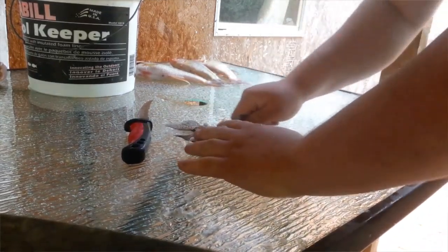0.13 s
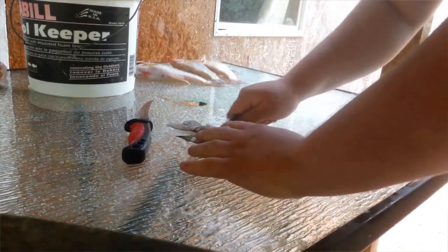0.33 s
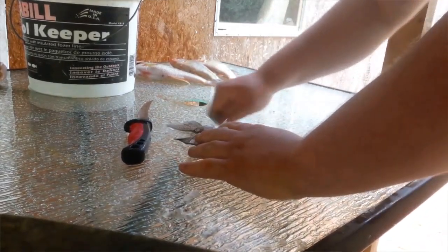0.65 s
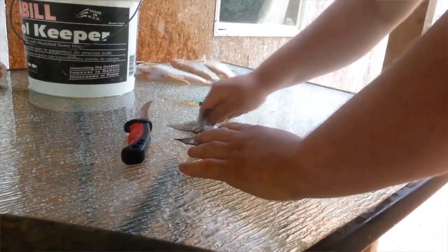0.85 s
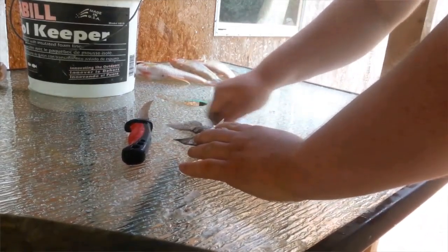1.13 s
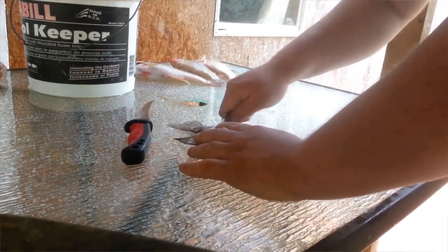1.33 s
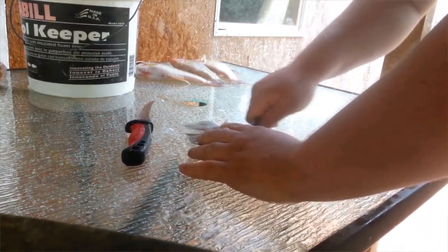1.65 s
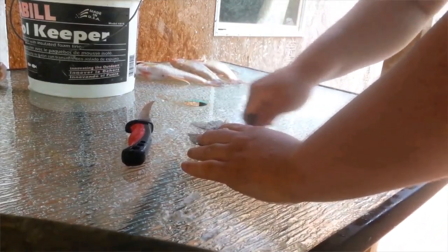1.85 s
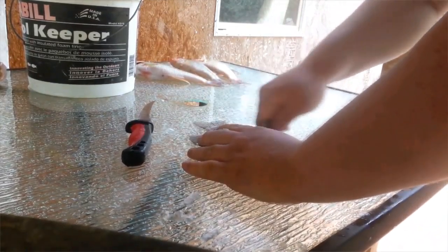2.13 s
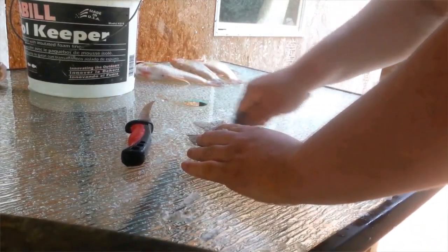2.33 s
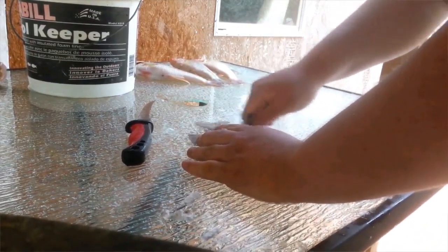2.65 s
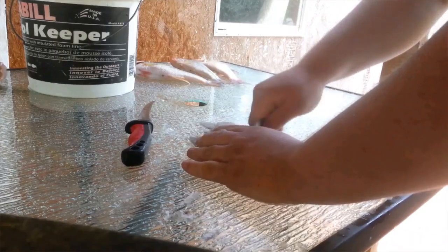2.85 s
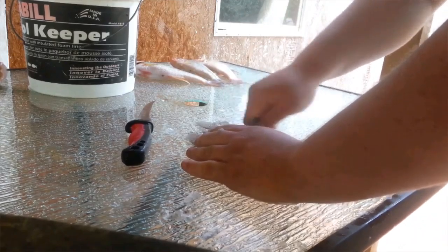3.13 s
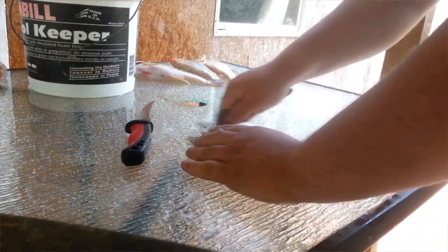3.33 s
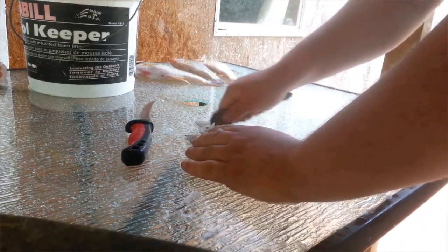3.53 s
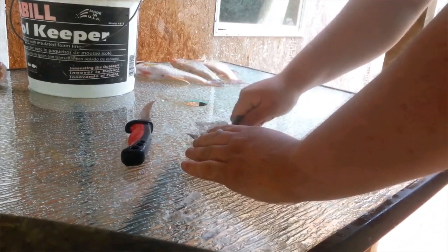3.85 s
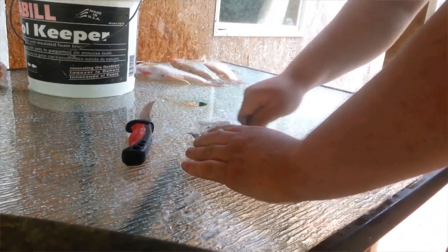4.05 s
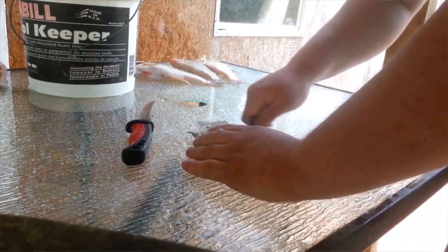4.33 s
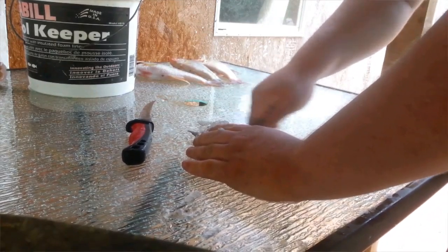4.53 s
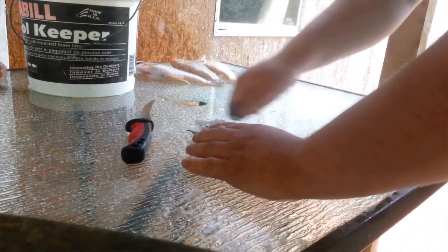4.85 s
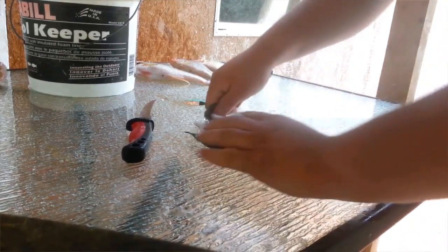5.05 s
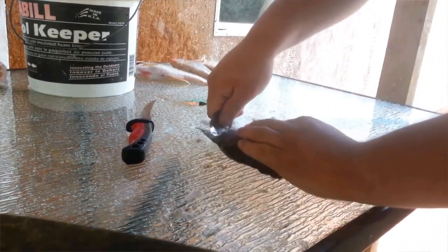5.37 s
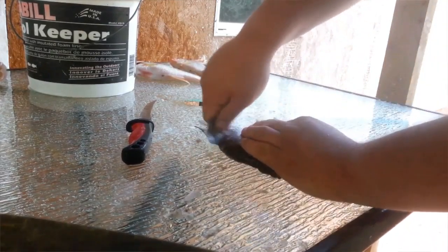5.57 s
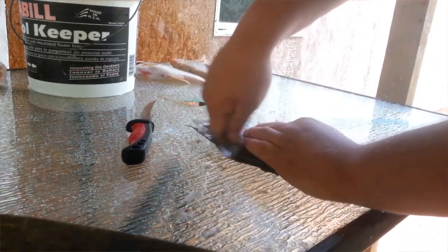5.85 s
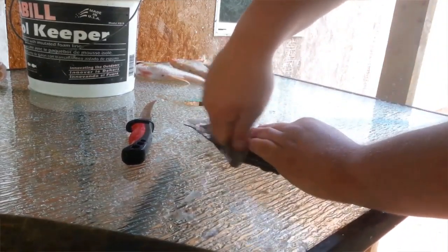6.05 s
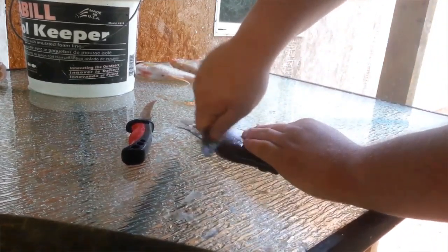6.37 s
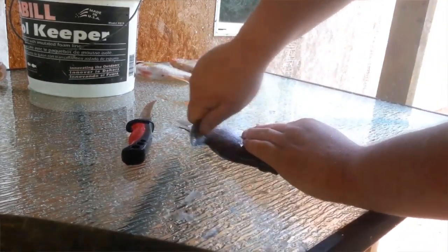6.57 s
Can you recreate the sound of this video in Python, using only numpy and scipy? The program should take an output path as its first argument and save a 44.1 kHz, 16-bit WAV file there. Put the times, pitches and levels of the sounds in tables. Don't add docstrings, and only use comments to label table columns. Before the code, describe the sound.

A spoon scrapes a small fish in quick short strokes on a glass table, scales crackling and hissing, while a far bird whistles and trills.

```python
import sys
import numpy as np
from scipy import signal
from scipy.io import wavfile
from scipy.ndimage import uniform_filter1d

SR = 44100
rng = np.random.default_rng(int(sys.argv[2]) if len(sys.argv) > 2 else 0)


def transcribe(u):
    v = np.clip(np.atleast_2d(u).T, -1, 1)
    q = np.round(v * 32767).astype(np.int16)
    wavfile.write(sys.argv[1], SR, q)


def undo_db(level):
    steps = np.asarray(level, float) / 20
    return 10 ** steps


N = 295632
TIME_S = np.arange(N) / SR
CONTROL_S = np.arange(0, N / SR + .002, .001)

# frequency in Hz, level in dB per Hz.
AIR_SPECTRUM = [(15, -47), (25, -14.5), (54, -12), (125, 3.5), (326, -0.5), (515, -5.5), (790, -7),
                (1120, -12), (3350, -15), (6200, -23.5), (10000, -19.5), (13100, -24), (15000, -10)]
# time in seconds, level in dB.
LEAF_LEVEL = [(0.0, -70), (1.32, -63), (1.7, -65), (2.37, -66), (2.99, -65), (3.79, -64.5), (4.74, -68.5),
              (5.75, -68), (5.99, -64.5), (6.7, -63.5)]
# frequency in Hz, likeness 0-1.
AIR_LIKENESS = [(40, 0.225), (100, 0.58), (250, 0.51), (600, 0.025), (15000, 0.0196)]

# start in seconds, length in seconds, from Hz, to Hz, level in dB.
WHISTLES = [(0.68, 0.04, 1854, 1990, -74), (0.84, 0.072, 1790, 1960, -69.5),
            (1.04, 0.04, 1753, 2040, -67.5), (1.224, 0.055, 1790, 2040, -65),
            (1.421, 0.075, 1838, 2093, -65), (1.632, 0.058, 1820, 1960, -66.5)]
# start in seconds, length in seconds, from Hz, to Hz, level in dB.
DROPS = [(s, .038, 2260, 1800, db - 2.5) for s, db in [ (3.29, -61), (3.4, -62), (3.61, -59), (3.79, -64),
         (3.875, -61), (3.96, -63), (4.045, -61), (4.15, -65), (4.245, -61), (4.325, -59), (4.41, -61),
         (4.5, -62)]]
# start in seconds, length in seconds, from Hz, to Hz, level in dB.
CHIPS = [(s, .009, from_hz, to_hz, db) for s, from_hz, to_hz, db in [ (4.718, 2900, 3500, -62),
         (4.731, 2450, 3100, -59), (5.037, 2700, 3600, -59), (5.049, 2500, 3150, -61),
         (5.063, 2600, 3100, -65), (5.173, 2450, 3450, -62), (5.186, 2500, 3500, -62),
         (5.198, 2600, 3300, -68), (5.328, 2700, 3200, -69), (5.34, 2800, 3500, -65),
         (5.351, 2900, 3450, -68), (5.478, 2900, 3400, -68), (5.49, 2900, 3400, -67),
         (5.637, 2400, 3200, -64), (5.65, 2700, 3600, -60), (5.662, 2900, 3450, -65),
         (5.78, 2450, 2900, -65), (5.786, 2500, 3400, -63), (5.93, 2300, 3300, -62),
         (5.943, 2350, 3450, -63)]]
# start in seconds, length in seconds, from Hz, to Hz, level in dB.
TRILLS = [(1.794, 0.053, 2250, 2500, -59.5), (1.845, .14, 2480, 2560, -58.5), (1.81, .16, 2000, 2100, -67),
          (1.985, 0.094, 2500, 2550, -58), (2.085, 0.26, 2620, 2720, -58), (1.94, 0.28, 2180, 2250, -64.5),
          (1.991, .03, 3500, 3500, -56), (2.101, 0.15, 3500, 3856, -66), (2.1, .14, 3300, 3260, -70),
          (2.299, 0.096, 2350, 2250, -60.5), (2.66, 0.063, 2600, 2000, -60), (2.8, .09, 2300, 2300, -60),
          (2.8, 0.19, 1798, 1828, -67), (2.95, 0.234, 2200, 2060, -60), (3.051, .12, 1851, 2000, -67),
          (6.345, 0.18, 2500, 2700, -63.5), (6.61, 0.088, 2700, 2600, -60), (5.75, .12, 3300, 3190, -63.5)]

# start in seconds, length in seconds, level in dB.
RUSTLES = [(1.283, 0.12, -58), (2.05, .22, -65), (2.624, 0.26, -71.5), (3.75, .07, -64),
           (3.931, 0.11, -67.5), (4.04, .12, -63.5), (4.148, 0.18, -64.5), (4.38, 0.091, -71.5),
           (6.33, .2, -69), (6.598, 0.15, -62)]
# frequency in Hz, width in Hz, gain in dB.
RUSTLE_MODES = [(2920, 540, -3), (3700, 550, 2), (4580, 680, -2.5)]

# time in seconds, peak in dB, thud share in dB, ring length share, crack in dB.
KNOCKS = [
    (1.094, -39, -28, 2.4, -10),
    (1.286, -23.5, -35, 1.8, -17),
    (3.448, -49, -5, 1.3, -16),
    (3.934, -68, -25, 1.1, -6),
    (3.983, -58, -28, 0.92, -6),
    (4.105, -37.5, -28, 1.06, -13),
    (4.208, -48, -10, 1.02, -14),
]
# frequency in Hz, level in dB, 60 dB decay in seconds.
SPOON_MODES = [(798, -4.5, 0.036), (976, -8.5, 0.06), (1210, 8, 0.019), (1310, -26, 0.009),
               (1960, -3, 0.021), (2250, -4, 0.0093), (2740, -8.5, 0.017), (3490, -9.5, 0.013),
               (4145, -6.5, 0.022), (5060, -5, 0.0064)]
# time in seconds, peak in dB.
SLAPS = [
    (6.529, -42),
    (6.587, -28),
]
# frequency in Hz, level in dB, 60 dB decay in seconds.
SLAP_MODES = [(293, 16.5, 0.013), (807, -3, 0.037), (1222, 1.5, 0.011), (1900, -15, 0.012),
              (2394, -21.5, 0.016)]
# time in seconds, peak in dB.
TICK = (6.0655, -31.5)

# peak in seconds, hiss in dB, treble lift in dB.
SPRAYS = [(0.018, -60.5, -10), (0.337, -66, 8), (.57, -71, 4), (0.635, -59.5, -7), (.68, -63.5, 3.5),
          (0.89, -59, 0), (.93, -71, 7), (1.125, -54, -3), (1.298, -55.5, -4.5), (1.33, -52.5, -22),
          (1.601, -61, 3), (1.85, -64, 6), (2.086, -49.5, -1.5), (2.303, -48.5, 3), (2.572, -49.5, 4.5),
          (2.802, -57, 3), (3.03, -45, 1.5), (3.25, -57, -10), (3.298, -58.5, 4), (3.501, -55, 0.5),
          (3.755, -64, -6), (3.993, -59, -5), (4.03, -64.5, -24), (4.115, -56, -22), (4.215, -58.5, -23),
          (4.26, -67, -20), (4.429, -61.5, -13), (4.708, -57.5, 2.5), (4.919, -47.5, -7)]
# peak in seconds, hiss in dB, treble lift in dB.
LIGHT_SPRAYS = [(5.17, -79.5, 9), (5.48, -65, -11), (5.84, -62, 3.5), (5.95, -63, -1), (6.065, -57, 3),
                (6.145, -69, 9), (6.224, -64.5, 4.5), (6.32, -66, 4.5), (6.41, -67.5, 9.5),
                (6.63, -54.5, 0), (6.7, -53.5, -20)]
# time in seconds, peak in dB.
SNAPS = [(0.8729, -48), (0.8834, -45), (1.0954, -49), (1.1193, -47), (1.2852, -28.5), (2.0593, -45),
         (2.2863, -36), (2.2967, -31), (2.3027, -28.5), (2.5272, -52), (2.5326, -44), (2.5573, -34.5),
         (2.5734, -37), (2.7871, -46), (3.0107, -38), (3.017, -32), (3.0404, -29), (3.2196, -51),
         (3.2985, -42), (3.4779, -54), (3.4913, -39.5), (3.7514, -46), (3.9811, -40), (4.104, -39),
         (4.2066, -45), (4.2373, -55), (4.4117, -60), (4.6513, -52), (4.7014, -44), (4.7096, -46),
         (4.8732, -52), (4.8884, -37)]
# frequency in Hz, level in dB per Hz.
HISS_SPECTRUM = [(880, -30), (1500, 7), (1640, -5), (1960, 7), (3000, 1.5), (4630, -9), (9000, -4.5),
                 (12500, -26.5), (15000, 35.5)]
# frequency in Hz, left minus right in dB.
HISS_LEAN = [(60, 0.0), (180, 1.0), (540, 64), (1630, 17.5), (4910, -29.5), (14800, -9)]
# frequency in Hz, width in Hz, gain in dB.
RATTLE_MODES = [(714, 180, 4.5), (816, 166, 4), (916, 108, -0.5), (1367, 263, -2.5), (1402, 114, 1.5),
                (2054, 225, -7.5), (2550, 1470, -18)]

# frequency in Hz, width in Hz, gain in dB.
TOP_MODES = [(119.7, 12, -4), (206.3, 10, 1.5), (251.8, 1.7, -3), (294.7, 4.8, -1.5), (350, 8.3, -3.5),
             (411.2, 15, 13), (532, 66, 1)]
# frequency in Hz, width in Hz, gain in dB.
AFTER_RING_MODES = [(300, 21.7, 2.5), (332.3, 10.7, 1.5)]
# time in seconds, peak in dB, hold-back of the edge 0-1.
BITES = [(0.872, -32.5, 0.46), (1.125, -32, 0.3), (2.288, -27, 0.65), (2.533, -34, .2), (3.225, -28, 0.22),
         (3.752, -32, 0.18), (4.208, -31, 0.18), (2.513, -58, 0.21), (2.755, -49, 0.39), (2.964, -50, 0.44),
         (3.04, -26, 0.5), (3.214, -35, 0.74), (3.49, -31, 0.44), (3.743, -56, 0.65), (4.412, -39, 0.57),
         (4.651, -32, 0.72), (4.873, -25.5, 0.53), (4.921, -27.5, 0.35)]
# start in seconds, length in seconds, drum in dB, scale rows per second, crackle in dB.
STROKES = [(0.639, 0.073, -50, 360, -59.5), (0.879, 0.065, -47, 390, -58), (1.106, 0.059, -49, 357, -53),
           (1.329, 0.079, -47.5, 354, -51.5), (1.565, 0.05, -48.5, 310, -56.5),
           (1.805, 0.066, -52, 349, -64), (2.04, 0.081, -50, 338, -54), (2.281, 0.046, -44.5, 293, -53.5),
           (2.512, 0.087, -42.5, 291, -53), (2.745, 0.078, -47, 333, -56.5),
           (2.964, 0.092, -40, 349, -49.5), (3.223, 0.071, -37, 406, -45),
           (3.483, 0.0773, -41.5, 370, -48.5), (3.738, 0.053, -43, 268, -49),
           (3.982, 0.053, -50.5, 342, -52), (4.19, 0.075, -49, 263, -53.5), (4.41, 0.06, -52.5, 326, -56),
           (4.642, 0.063, -45.5, 251, -49.5), (4.874, 0.081, -42, 353, -50)]
DRAGS = [(0.0, 0.071, -74, 388, -61), (0.29, 0.092, -64.5, 329.4, -68), (0.719, .07, -70, 300, -76),
         (.96, 0.066, -60, 295, -67), (1.211, 0.1, -59.5, 313, -73), (1.294, 0.022, -46.5, 403, -55),
         (2.165, 0.04, -66, 334.9, -59.5), (2.358, 0.078, -63.5, 310.3, -65.5),
         (3.06, 0.11, -68.5, 303.4, -74), (3.32, 0.12, -54, 341.3, -67.5), (3.63, 0.0709, -58, 329.8, -61),
         (3.858, 0.051, -65, 300, -81), (3.92, 0.044, -62, 323.8, -53), (4.09, 0.095, -63.5, 328.3, -59),
         (4.99, .05, -79, 297.4, -67.5), (5.45, 0.048, -64.5, 344.2, -64.5), (5.64, 0.064, -64, 350, -79),
         (5.799, 0.086, -61, 365.7, -62.5), (6.02, 0.16, -68.5, 283.5, -62), (6.199, 0.031, -74, 285, -59),
         (6.34, 0.11, -61, 338, -63.5), (6.51, 0.027, -59, 312.8, -60), (6.594, 0.095, -68, 319, -52)]
PUSHES = [(1.36, 0.036, -44, 320, -60), (2.545, 0.039, -40.5, 300, -60), (4.905, 0.034, -40, 340, -55),
          (3.76, .025, -45, 216, -52), (.9, 0.027, -50, 320, -61), (2.3, 0.01, -41, 299.2, -50),
          (4.245, .015, -50, 400, -56), (1.165, 0.021, -48, 328, -73), (1.42, 0.022, -52.5, 327, -60),
          (2.25, 0.039, -53, 279.9, -63), (2.325, 0.021, -53, 356.2, -72), (3.793, 0.022, -43, 325.2, -57),
          (4.7, 0.024, -49.5, 309.2, -68), (3.505, 0.049, -40, 324.4, -47), (4.14, 0.036, -61, 300, -71),
          (4.25, 0.037, -54, 278.4, -59), (4.475, 0.041, -59, 325, -63)]


def rms_one(x):
    return x / np.sqrt(np.mean(x ** 2) + 1e-20)


def in_time(rows):
    s, *columns = np.transpose(rows)
    return [np.interp(TIME_S, s, c) for c in columns]


def at_hz(points, hz):
    point_hz, value = np.transpose(points)
    return np.interp(np.log(hz), np.log(point_hz), value)


def high_pass(x, hz, order):
    return signal.sosfilt(signal.butter(order, hz, "high", fs=SR, output="sos"), x)


def drift(rate_hz):
    r = np.exp(-80 * np.pi * rate_hz / SR)
    noise = rng.standard_normal(N // 40 + 2002)
    slow = signal.lfilter([1], [1, -2 * r, r * r], noise)[2000:]
    return np.interp(np.arange(N) / 40, np.arange(len(slow)), rms_one(slow))


def resonate(x, modes):
    out = 0
    for k, (hz, width_hz, db) in enumerate(modes):
        r = np.exp(-np.pi * width_hz / SR)
        a = [1, -2 * r * np.cos(2 * np.pi * hz / SR), r * r]
        out = out + (-1) ** k * undo_db(db) * signal.lfilter([(1 - r * r) / 2, 0, (r * r - 1) / 2], a, x)
    return out


def grains(per_s, spread_db):
    sizes = undo_db(spread_db * np.minimum(rng.exponential(1, N), 5)) * rng.choice([-1, 1], N)
    return sizes * (rng.random(N) < per_s / SR) + 1e-18


def bands(source, spectrum, likeness, patchy_db, lean=((20, 0), (20000, 0))):
    out = 0
    edges_hz = 22 * 2 ** np.arange(0, 9.6, .5)
    for k, (low, high) in enumerate(zip(edges_hz, edges_hz[1:])):
        hz = np.sqrt(low * high)
        if spectrum[0][0] / 1.2 < hz:
            band = signal.butter(2, [low, high], "band", fs=SR, output="sos")
            mid, side = signal.sosfilt(band, source[k % 2])
            alike = np.clip(at_hz(likeness, hz), 0, 1)
            lean_db = at_hz(lean, hz) * np.array([[.5], [-.5]])
            gain = undo_db(at_hz(spectrum, hz) + patchy_db * drift(7.4) + lean_db)
            out = out + gain * (np.sqrt(1 + alike) * mid + np.sqrt(1 - alike) * side * [[1], [-1]])
    return out / np.sqrt(np.mean(out.mean(0) ** 2))


def struck(events, modes, length_share, crack_db):
    crack_s, chance_db = .0006, 1.85
    out, t = np.zeros(N + 9000), np.arange(9000) / SR
    for (s, db), share, crack in zip(events, length_share, crack_db):
        blow = undo_db(crack) * rng.standard_normal(len(t)) * np.exp(-t / crack_s)
        for (hz, mode_db, t60), chance in zip(modes, rng.normal(0, chance_db, len(modes))):
            decay = undo_db(mode_db + chance - 60 * t / (t60 * share))
            blow += decay * np.sin(2 * np.pi * hz * t) * np.minimum(hz * t / 2.0, 1)
        out[round(s * SR):][:len(t)] += undo_db(db) * blow / np.abs(blow).max()
    return out[:N]


def yard(x, t60, early_s):
    t = np.arange(round(.5 * SR)) / SR
    tail = rng.standard_normal((2, len(t))) * undo_db(-60 * t / t60) * (t > early_s)
    return signal.fftconvolve(x[None], tail / np.sqrt(np.sum(tail ** 2, 1, keepdims=True)), axes=1)[:, :N]


def air():
    noise = rng.standard_normal((2, 2, N))
    steady = undo_db(-61.5) * bands(noise, AIR_SPECTRUM, AIR_LIKENESS, patchy_db=1.8)
    upper = high_pass(steady, 140, order=2)
    level_db = in_time(LEAF_LEVEL)[0]
    return steady + (undo_db(level_db - level_db.mean()) - 1) * upper


def bird_notes():
    spread_share = .02
    song = np.zeros(N)
    notes = WHISTLES + DROPS + CHIPS
    chances = 1 + spread_share * rng.standard_normal((len(notes), 3))
    for (s, length_s, from_hz, to_hz, db), (a, b, c) in zip(notes, chances):
        from_hz, to_hz, length_s = from_hz * a ** .5, to_hz * b, length_s * c ** 4
        u = np.linspace(0, 1, round(length_s * SR))
        phase = np.cumsum(from_hz + (to_hz - from_hz) * u ** 0.773) / SR
        swell = np.sin(np.pi * u ** 0.17) ** 0.22
        song[round(s * SR):][:len(u)] += undo_db(db + 10.0) * swell * np.sin(2 * np.pi * phase)
    return song


def bird_trill():
    per_s, first_s, gap_share = 27.7, 1.83, .3
    sweep_share, edge_s = .06, .012
    song = np.zeros(N)
    cycle = (TIME_S - first_s) * per_s % 1
    gate = np.clip(np.minimum(cycle - gap_share, 1 - cycle) * 6, .18, 1)
    flutter = undo_db(3 + 2.0 * drift(40)) * gate
    waver = 1 + .024 * drift(150)
    for s, length_s, from_hz, to_hz, db in TRILLS:
        since = TIME_S - s
        edges = np.clip(np.minimum(since, length_s - since) / edge_s, 0, 1)
        glide_hz = from_hz + (to_hz - from_hz) * since / length_s
        hz = glide_hz * (waver + sweep_share * (3 * cycle - 2))
        song += undo_db(db) * edges * flutter * np.sin(2 * np.pi * np.cumsum(hz) / SR)
    return song


def bird():
    song = (bird_notes() + bird_trill()) * undo_db(2.0 * drift(120))
    return undo_db(-5) * song + undo_db(-4) * yard(song, t60=.22, early_s=.004)


def rustling():
    s, length_s, db = np.array(RUSTLES).T[:, :, None]
    along = np.clip((CONTROL_S - s) / length_s, 0, 1)
    swell = np.sum(undo_db(db) * np.sin(np.pi * along ** 0.57), axis=0)
    ears = [rms_one(resonate(grains(1200, spread_db=2.5), RUSTLE_MODES)) for ear in "lr"]
    return np.interp(TIME_S, CONTROL_S, swell) * undo_db(2.8 * drift(40)) * ears * undo_db([[-2.5], [2.5]])


def knocks():
    rows = np.array(KNOCKS)
    thud = np.zeros(N)
    thud[np.round(rows[:, 0] * SR).astype(int)] = undo_db(rows[:, 1] + rows[:, 2] + 47.5)
    spoon = struck(rows[:, :2], SPOON_MODES, rows[:, 3], rows[:, 4])
    slaps = struck(SLAPS, SLAP_MODES, [.8, .8], crack_db=[-30, -30])
    return spoon + resonate(thud + 1e-18, TOP_MODES) + slaps


def tick():
    return struck([TICK], [(1440, 20.3, 0.0037), (3500, 3.0, 0.0076)], [1], crack_db=[3])


def spraying():
    rise_s, fall_s, round_s, skirt_db, skirt_s = 0.017, 0.022, 0.0076, -20.5, 0.11
    rows = np.array(SPRAYS + LIGHT_SPRAYS)
    since = CONTROL_S - rows[:, :1]
    away = np.sqrt(since ** 2 + round_s ** 2) - round_s
    shape = np.exp(-away / np.where(since < 0, rise_s, fall_s))
    shape = shape + undo_db(skirt_db) * np.exp(-away / skirt_s) * (since > 0)
    power = np.sum((undo_db(rows[:, 1:2]) * shape) ** 2, axis=0)
    return np.interp(TIME_S, CONTROL_S, np.sqrt(power))


def snapping():
    level_db, ease_s = -13.5, 0.0067
    s, db = np.transpose(SNAPS)
    tear = np.zeros(N)
    tear[np.round(s * SR).astype(int)] = undo_db(db + level_db)
    return signal.lfilter([1], [1, -np.exp(-1 / (ease_s * SR))], tear + 1e-18)


def scale_hiss(clump):
    clicks = [[rms_one(grains(4000, spread_db=0.5)) for ear in "lr"] for deal in "ab"]
    clicks = np.array(clicks) * clump ** 0.6
    likeness = [(1500, 0.064), (15000, 0.2)]
    level = np.hypot(spraying(), snapping())
    hiss = level * bands(clicks, HISS_SPECTRUM, likeness, patchy_db=2.0, lean=HISS_LEAN)
    lift_db = in_time(SPRAYS + LIGHT_SPRAYS)[1]
    return hiss + (undo_db(lift_db) - 1) * high_pass(hiss, 3000, order=2)


def effort(column, peak_share, swell_db, release_s):
    attack_s = 0.0032
    rows = np.array(STROKES + DRAGS + PUSHES)
    since, length_s = CONTROL_S - rows[:, :1], rows[:, 1:2]
    along = np.clip(since / length_s, 0, 1)
    before, after = (peak_share - along) / peak_share, (along - peak_share) / (1 - peak_share)
    off = np.where(along < peak_share, before, after)
    edges = np.clip(since / attack_s, 0, 1) * np.exp(-np.maximum(since - length_s, 0) / release_s)
    power = np.sum((undo_db(rows[:, column, None] + swell_db * off ** 2) * edges) ** 2, axis=0)
    return np.interp(TIME_S, CONTROL_S, np.sqrt(power))


def biting(size, ease_s):
    bite = np.zeros(N)
    bite[[round(row[0] * SR) for row in BITES]] = size
    return signal.lfilter([1], [1, -np.exp(-1 / (ease_s * SR))], bite + 1e-18)


def scale_crackle(clump):
    snaps = grains(1500, spread_db=2.0) * clump
    force = effort(column=4, peak_share=0.26, swell_db=-10, release_s=0.016)
    force = force + undo_db(-19) * biting(undo_db(np.array(BITES)[:, 1]), ease_s=0.0087)
    return force * rms_one(resonate(snaps, RATTLE_MODES))


def rows_per_s():
    start_per_s, speed_up_share = 215, 0.31
    points = [(s, start_per_s) for s, *_ in STROKES]
    for s, length_s, _, per_s, _ in STROKES + DRAGS + PUSHES:
        points += [(s + speed_up_share * length_s, per_s), (s + .8 * length_s, per_s)]
    return in_time(sorted(points))[0]


def drumming():
    force = effort(column=2, peak_share=0.51, swell_db=-13, release_s=0.021)
    held = biting(np.array(BITES)[:, 2], ease_s=0.02367)
    turns = np.cumsum(rows_per_s() * (1 - 0.0505 * held + 0.03554 * drift(51.4))) / SR
    friction = .2 * drift(330)
    push = np.sin(2 * np.pi * turns) * undo_db(2.0 * drift(30)) + friction
    top = resonate(push, TOP_MODES) + undo_db(-2) * push
    even = top / np.sqrt(uniform_filter1d(top ** 2, size=1800))
    drum = force * undo_db(3.5 * held) * even
    return drum + resonate(drum, AFTER_RING_MODES)


def scene():
    clump = undo_db(3.2 * drift(110))
    crackle, hiss = scale_crackle(clump), scale_hiss(clump)
    drum, hits = drumming(), knocks()
    near = drum * undo_db([[-.2], [.2]]) + (crackle * undo_db(-3) + hits) * undo_db([[-1.2], [1.2]])
    porch = undo_db(-7.5) * yard(drum, t60=0.19, early_s=0.001)
    porch = porch + undo_db(-2.5) * yard(crackle, t60=0.073, early_s=0.0022)
    porch = porch + undo_db(-7) * yard(hits, t60=0.19, early_s=0.013)
    table = high_pass(near + porch, 125, order=4)
    return table + tick() + hiss + bird() + air() + rustling()


def band_limit(x):
    return signal.sosfilt(signal.butter(12, 15380, fs=SR, output="sos"), x)


def record(dry):
    cut = signal.sosfilt(signal.cheby2(14, 45, 14900, fs=SR, output="sos"), dry)
    return band_limit(cut)


dry = scene()
out = record(dry)
transcribe(out)
```